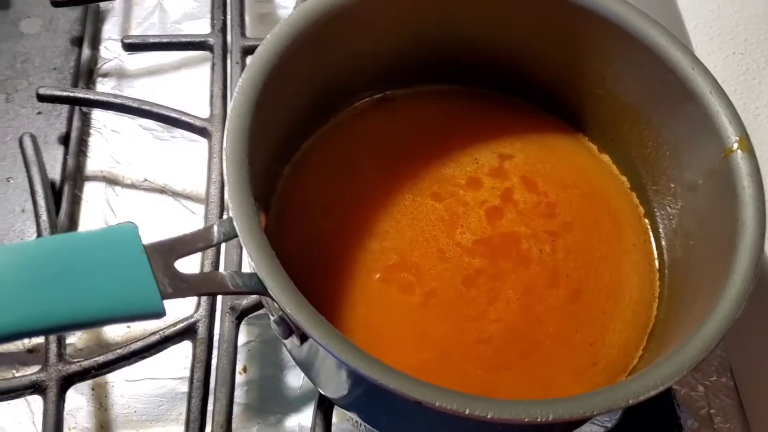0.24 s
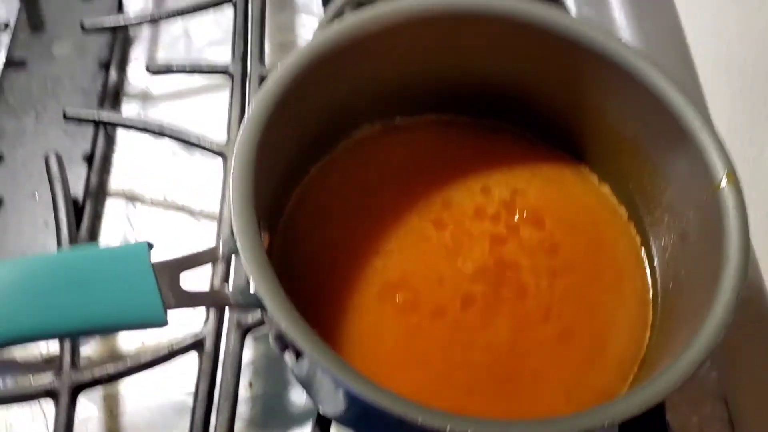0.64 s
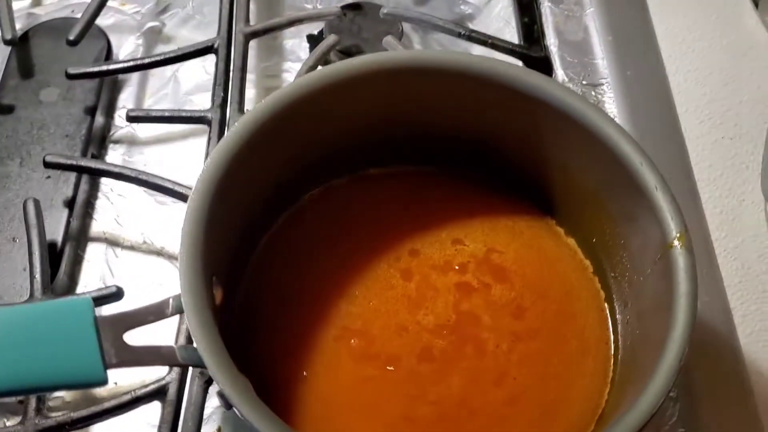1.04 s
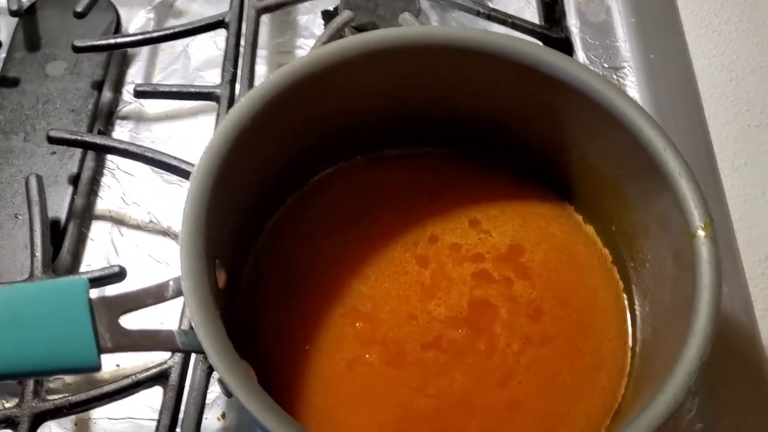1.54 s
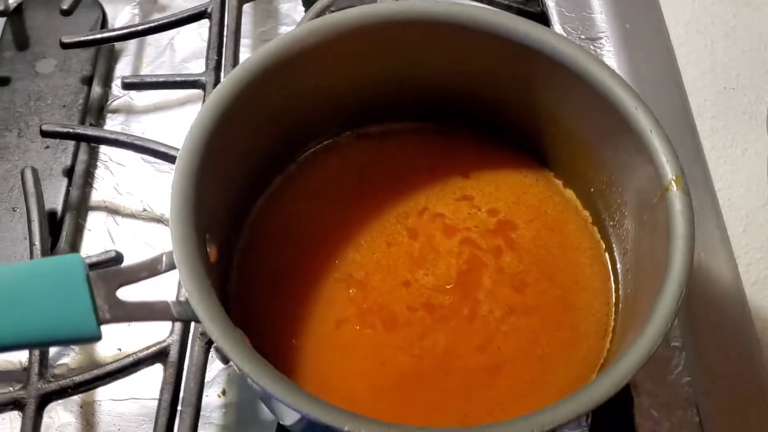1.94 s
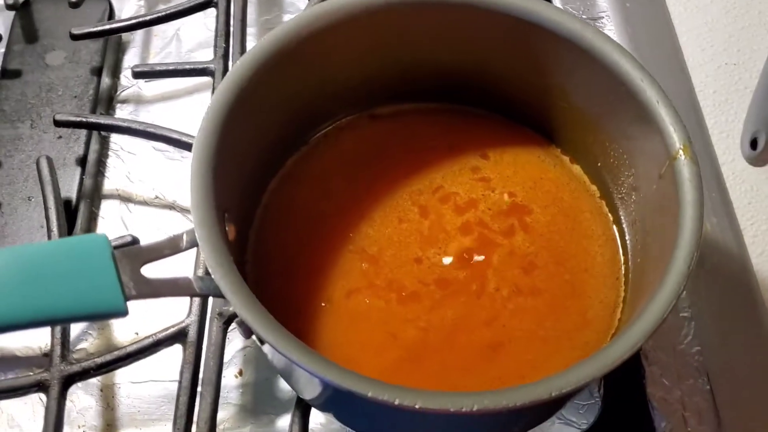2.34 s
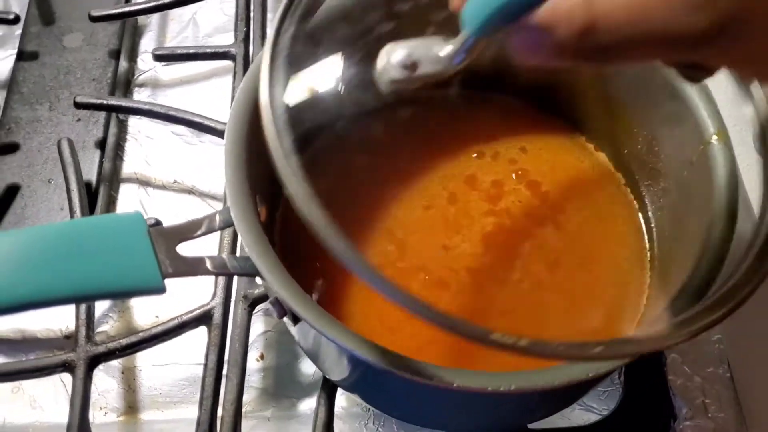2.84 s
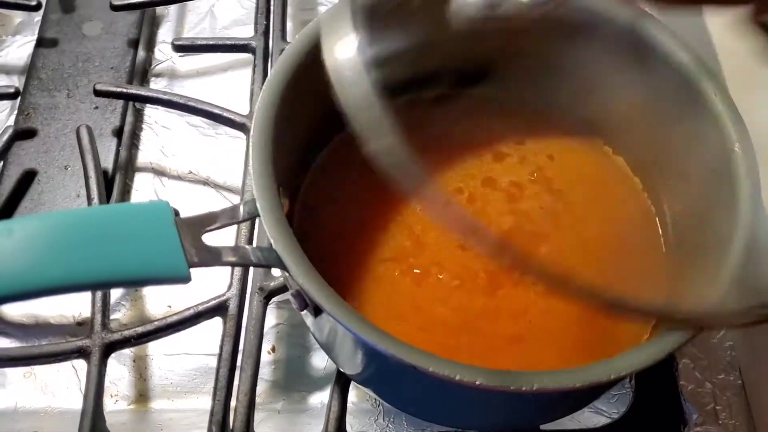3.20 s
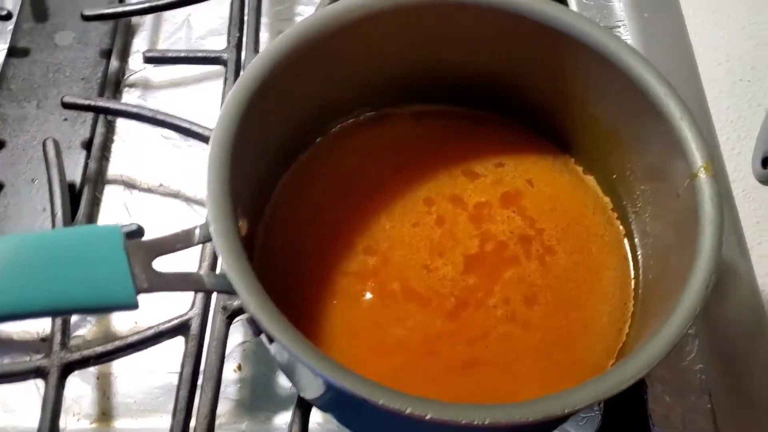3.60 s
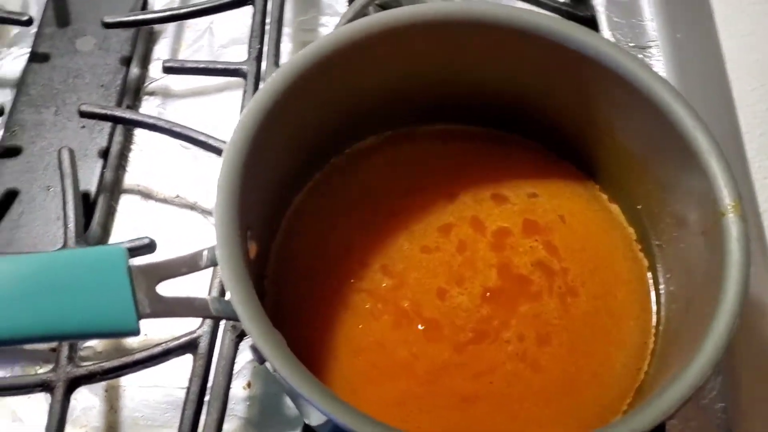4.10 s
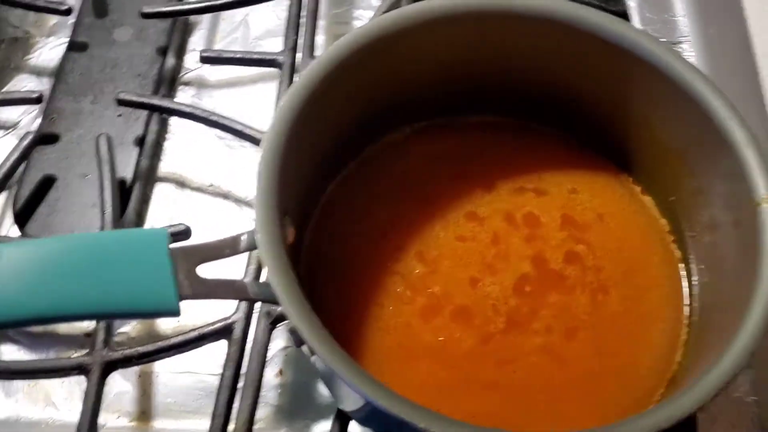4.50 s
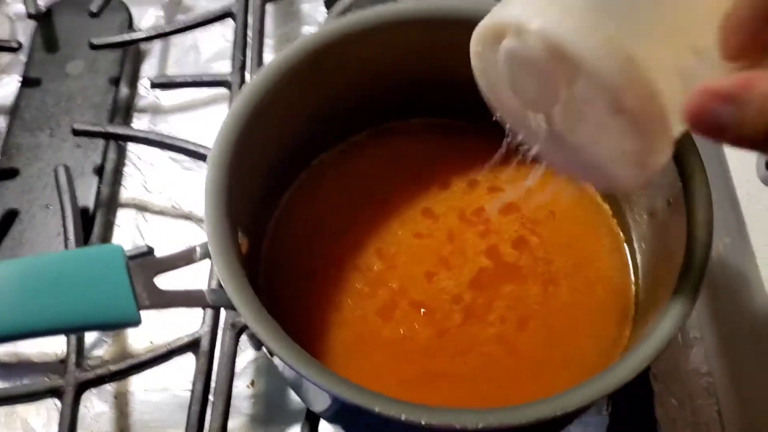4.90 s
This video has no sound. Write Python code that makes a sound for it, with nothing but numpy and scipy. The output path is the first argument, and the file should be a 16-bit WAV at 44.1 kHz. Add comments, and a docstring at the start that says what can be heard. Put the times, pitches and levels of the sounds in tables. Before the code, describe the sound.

A quiet small kitchen with hard walls, heard close in stereo, most sources slightly right; faint low rumble, murmur and hiss throughout. At 0-0.6 s there are light lid and utensil clinks, soft low bubble plops, a bright tick and a faint hinge squeak. At 0.73-0.96 s a quick tumble of hollow wooden knocks rattles the pots, with another weak squeak. Glassy clinks cluster around 1.26-1.35 s; a sleeve brushes near 1.5 s. Boomier thuds follow at 1.6-1.9 s, then a sharper knock group at 2.14-2.23 s. Small clinks come at 2.6 s, a barely audible thin tone at 2.9 s, and a moderate lid knock at 3.0 s. Cloth brushes at 3.4 s. The loudest passage, a dense hard clatter of wood and pots, runs 3.67-3.9 s. After a plop and tick near 4.35 s, salt shakes hiss, dry and grainy, at 4.6, 4.8, 4.9, 5.05 and 5.15 s.

```python
"""A small kitchen by the stove

A cupboard door squeaks, pots and a glass lid knock on wooden shelves and the counter, small things clink and
tick, a sleeve brushes, and at the end a salt shaker is shaken; sauce simmers and the room hums faintly.
Struck bodies are gritty contact forces driving resonances; rubbing, grains and air are shaped noise; the
hinge is a gliding overtone stack and bubbles are short rising tones. One faint, thin, slightly wavering tone
sounds by itself. Two microphone ports, a room with hard walls, most sounds a little to the right."""
import sys
import numpy as np
from scipy import signal
from scipy.fft import rfft, irfft, next_fast_len
from scipy.io import wavfile
from scipy.ndimage import uniform_filter1d, map_coordinates

SR = 44100
rng = np.random.default_rng(int(sys.argv[2]) if len(sys.argv) > 2 else 0)


def volts(x):
    """Linear amplitude factor 10**(x/20) for a level x in dB, scalar or array-like."""
    e = np.asarray(x, float) / 20
    return 10 ** e


def log_audio(samples):
    """Write samples as a 16-bit WAV file to the path given in sys.argv[1]."""
    # one column per channel
    frames = np.atleast_2d(samples).T
    # limit to full scale, then quantise
    limited = np.clip(frames, -1, 1)
    pcm = np.round(limited * 32767).astype(np.int16)
    wavfile.write(sys.argv[1], SR, pcm)


N = 227115
SPAN = 8192  # samples given to one contact or bubble


def unit(x):
    """Power normalisation: scaled to rms 1."""
    return x / np.sqrt(np.mean(x ** 2) + 1e-20)


def along(points, hz):
    """Interpolation of (Hz, value) points on a logarithmic frequency axis."""
    point_hz, value = np.transpose(points)
    return np.interp(np.log(hz + 1), np.log(point_hz + 1), value)


def wobble(rate, size=N):
    """Slow random modulation: a smooth curve through rate random knots a second."""
    knots = rng.standard_normal(int(size * rate / SR) + 4)
    return map_coordinates(knots, [np.arange(size) * rate / SR])


def swell(s, rise_s, fall_s):
    """Gaussian envelope of height 1, 20 dB down one rise before and one fall after its top."""
    late = np.arange(N) / SR - s
    return volts(-20 * (late / np.where(late < 0, rise_s, fall_s)) ** 2)


def filtered(x, response):
    """Linear filtering: the spectrum of x times a complex response of frequency."""
    m = next_fast_len(x.shape[-1] + 8192)
    spectrum = rfft(x, m) * response(np.fft.rfftfreq(m, 1 / SR))
    return irfft(spectrum, m)[..., :x.shape[-1]]


def modes(table, hz):
    """Modal superposition: causal response of (Hz, width Hz, dB) resonances with alternating signs."""
    total = 0
    for k, (centre_hz, width_hz, db) in enumerate(table):
        damping = 1j * hz * width_hz
        total = total + (-1) ** k * volts(db) * damping / (centre_hz * centre_hz - hz * hz + damping)
    return total


def above(hz, edge_hz):
    """Causal steep high-pass: two second-order sections in series."""
    s = 1j * hz / edge_hz
    return (s * s / (s * s + np.sqrt(2) * s + 1)) ** 2


def rush(colour, source=None):
    """Diffuse-field coherence: stereo noise of rms 1, alike in the bass and unrelated in the treble."""
    # likeness of the two channels: hz, correlation
    likeness = [(40, 1), (200, 0.92), (600, 0.62), (1500, -0.026), (4000, -0.009), (12000, 0.035)]
    pair = rng.standard_normal((2, N)) if source is None else source

    def response(hz):
        turn = np.arccos(np.clip(along(likeness, hz), -1, 1)) / 2
        return colour(hz) * [np.cos(turn), np.sin(turn)]

    mid, side = filtered(pair, response)
    return unit(np.array([mid + side, mid - side]))


def contact(t60, blow, blow_s, rise_s, grit_db):
    """Contact force: a short push, then a gritty chatter of small impacts that rises and dies."""
    t = np.arange(SPAN) / SR
    grit = volts(grit_db * np.repeat(rng.exponential(size=SPAN // 64), 64))  # strength held for 64 samples
    chatter = unit(grit * rng.standard_normal(SPAN))
    chatter = chatter * volts(-60 * t / max(t60, .004)) * (1 - np.exp(-t / rise_s))
    push = blow * t / blow_s * np.exp(1 - t / blow_s)
    return chatter + push


def add(track, s, db, sound):
    """Superposition: lays one sound on the track, the rms of its loudest 256 samples at the given level."""
    at = round(s * SR)
    loudest = np.sqrt(uniform_filter1d(sound ** 2, size=256).max())
    track[..., at:at + SPAN] += volts(db) * sound / loudest


def air():
    """Band noise: rumble, murmur and hiss drift together and each on its own, over the recorder's fine noise."""
    # common drift of the three room bands: time_s, level_db (before each band's offset)
    drift = [(0, -65), (.6, -65), (1.13, -67), (1.5, -63), (2.05, -64), (2.8, -66.5), (3.2, -62),
             (3.6, -60), (4.2, -66), (5.15, -64)]
    # colour of the air: hz, level_db (per Hz, relative within each band)
    air_colour = [(12, -42), (20, 0.5), (71, 15.5), (183, -18.5), (402, -22), (857, -31.5), (959, -34.5),
                  (1170, -31), (1270, -29.5), (1380, -33.5), (2860, -27), (3900, -32), (12300, -35.5),
                  (15000, -32), (16300, -60.5)]
    drift_s, drift_db = np.transpose(drift)
    db = np.interp(np.arange(N) / SR, drift_s, drift_db)

    def part(lo_hz, hi_hz):
        def band(hz):
            upper_slope = np.sqrt(1 - abs(above(hz, hi_hz)) ** 2)
            return volts(along(air_colour, hz)) * abs(above(hz, lo_hz)) * upper_slope
        return rush(band)

    rumble = volts(db + 3.5 + 0.65 * wobble(10)) * part(7.5, 170)
    murmur = volts(db + 4.0 + 0.67 * wobble(5.3)) * part(240, 1200)
    hiss = volts(db - 1.8 + 1.4 * wobble(6.1)) * part(1050, 3300)
    fine_noise = volts(-85.0 + 1.4 * wobble(0.82)) * part(4600, 16000)
    # all but the rumble flickers in patches of time and frequency
    z = signal.stft(murmur + hiss + fine_noise, nperseg=512)[2]
    patches = uniform_filter1d(rng.standard_normal(z.shape[1:]), size=4, axis=0)
    patches = uniform_filter1d(patches, size=14, axis=1)
    flickering = signal.istft(z * volts(3.3 * unit(patches)), nperseg=512)[1][:, :N]
    return rumble + flickering


def clinks():
    """Modal ringing under impact: glass and steel touch, upper modes stronger at the edge, treble damped."""
    # lid and utensils touching: start_s, level_db, edge_db (upper modes, before an offset), rattle_t60_s
    touches = [(.019, -44.5, -28, 0.055), (.029, -45, 13, 0.028), (.097, -51, -10, 0.12),
               (.23, -57.5, 7, 0.043), (1.201, -57.5, -26, 0.067), (1.259, -39.5, -15, 0.12),
               (1.266, -32.5, -10, 0.027), (1.273, -34, -12, 0.052), (1.292, -38.5, -11, 0.11),
               (1.299, -35, -14, 0.074), (1.319, -38.5, -14, 0.042), (1.336, -34, -5, 0.059),
               (1.35, -47, -22, 0.44), (2.371, -58.5, 24, 0.33), (2.613, -34, 14, 0.019),
               (2.626, -37, 13, 0.01), (3.003, -40.5, 15, 0.069), (3.188, -50, -18, 0.34),
               (3.253, -55.5, -26, 0.23), (3.291, -52.5, -33, 0.17)]
    # resonances of the lid: centre_hz, width_hz, level_db
    lid = [(689, 9, -2), (1410, 175, 1), (1490, 500, -5.5), (2050, 250, 0.5), (2337, 83, 2), (2910, 750, 8),
           (2850, 2060, -1.5), (3960, 180, -33)]
    track = np.zeros(N + SPAN)
    for s, db, edge_db, t60 in touches:
        tilt = [(1700, 0), (2300, edge_db + 3.5)]
        force = contact(t60, blow=3, blow_s=0.00012, rise_s=0.001, grit_db=3)

        def response(hz):
            damped = 1 / (1 + 1j * hz / 5000) ** 4
            return modes(lid, hz) * volts(along(tilt, hz)) * above(hz, 870) * damped

        add(track, s, db, filtered(force, response))
    return track[:N]


def plops():
    """Bubble resonance: each bubble bursting in the simmering sauce sings a few cycles, rising a little."""
    # bubbles: start_s, level_db, pitch_hz (nominal; the tone starts 5 % below)
    bubbles = [(.169, -53.5, 855), (.311, -56, 810), (.363, -56, 850), (.411, -53.5, 816),
               (.503, -45.5, 810), (0.536, -50.5, 850), (2.392, -51.5, 830), (2.66, -57.5, 915),
               (3.47, -59, 790), (4.341, -45, 760)]
    track, t = np.zeros(N + SPAN), np.arange(SPAN) / SR
    envelope = volts(-60 * t / .015) * (1 - np.exp(-t / .0003))  # t60 and rise in s
    for s, db, hz in bubbles:
        tone = np.sin(2 * np.pi * hz * t * (.95 + 6 * t))
        add(track, s, db, tone * envelope)
    return track[:N]


def ticks():
    """Brief contact: a very short force has a broad spectrum, heard here as treble alone."""
    # tiny bright ticks: start_s, level_db, top_db (gain from 12.5 kHz up)
    specks = [(0.249, -65, -17), (0.4377, -40.5, -35), (1.1164, -68, -15), (1.3255, -38.5, 18),
              (1.3369, -57.5, 2), (2.241, -55.5, -18), (2.486, -57.5, -21), (2.592, -55, 3),
              (2.618, -54, -5), (2.6898, -58.5, 3), (2.9861, -68, -6), (3.519, -57.5, -7),
              (4.3607, -49, -27), (4.4458, -49.5, -1)]
    track = np.zeros(N + SPAN)
    for s, db, top_db in specks:
        tilt = [(9000, 0), (12500, top_db)]
        force = contact(.014, blow=2, blow_s=.00003, rise_s=0.0003, grit_db=1.5)
        add(track, s, db, filtered(force, lambda hz: volts(along(tilt, hz)) * above(hz, 3500)))
    return track[:N]


def brushing():
    """Friction noise: a sleeve slides over a surface in short strokes of coloured noise."""
    # strokes: loudest_s, level_db (before the flutter), rise_s, fall_s
    strokes = [(.47, -68, 0.055, 0.1), (.68, -64, 0.43, 0.071), (1.53, -61, 0.17, 0.11),
               (2.38, -67, .04, .07), (2.91, -69.5, 0.1, .08), (3.395, -54, 0.045, 0.079),
               (4.05, -69, .1, 0.21), (4.31, -65.5, 0.18, .03)]
    # colour of the cloth: hz, level_db (per Hz, relative)
    cloth = [(880, -3), (1500, 1), (2720, -17), (3380, -2.5), (4870, -28), (6060, -8), (7610, -8),
             (8830, -15.5), (11500, -7.5), (14800, -13), (16000, -27)]
    envelope = sum(volts(db) * swell(s, rise_s, fall_s) for s, db, rise_s, fall_s in strokes)
    flutter = volts(0.74 * wobble(45))
    return envelope * flutter * rush(lambda hz: volts(along(cloth, hz)))


def squeak():
    """Stick-slip oscillation: the hinge slips at a gliding rate with uneven overtones.

    One faint, thin, slightly wavering tone sounds later by itself."""
    # squeaks: loudest_s, level_db (added to each overtone's), slips_hz, glide_hz_per_s, half_length_s
    squeaks = [(.45, -60, 505, -110, .1), (.79, -67, 588, 260, .09), (2.13, -66, 742, 100, .05)]
    # strength of the hinge's overtones: hz, level_db
    hinge_colour = [(500, -5), (1000, -22), (2050, -13), (2550, 2), (3060, -10), (3570, -10), (4080, -10),
                    (4600, -11), (5100, -22), (5600, -22), (6100, -11), (6600, -26), (9000, -40)]
    # thin tone: start_s, end_s, pitch_hz, level_db (both before a slight wander)
    thin_tones = [(2.822, 2.973, 1367, -70)]
    track = np.zeros(N)
    for s, db, rate, glide, half_s in squeaks:
        start, end = round((s - 1.3 * half_s) * SR), round((s + 1.3 * half_s) * SR)
        size = end - start
        slips = rate + glide * (np.arange(start, end) / SR - s)
        phase = 2 * np.pi * np.cumsum(slips * (1 + .006 * wobble(60, size))) / SR
        stack = np.zeros(size)
        for k in range(1, 16):
            overtone_db = along(hinge_colour, rate * k) + 5 * wobble(35, size)
            stack += volts(overtone_db) * np.sin(k * phase)
        track[start:end] += np.sqrt(2) * volts(db) * swell(s, half_s, half_s)[start:end] * stack
    for start_s, end_s, hz, db in thin_tones:
        start, end = round(start_s * SR), round(end_s * SR)
        size = end - start
        level = np.hanning(size) * volts(db + 2.2 * wobble(30, size))
        cycles = hz * np.cumsum(1 + .004 * wobble(40, size)) / SR
        track[start:end] += level * np.sin(2 * np.pi * cycles)
    return track


def knocks():
    """Modal excitation: each blow rings the wood at new strengths and wakes the pots; firm blows settle sooner."""
    # blows on wood: start_s, level_db, boom_db, clatter_db (bass and upper gains in the wood),
    # crack_db (pots over the blow)
    blows = [(0.73, -48.5, 9, -15, -13.5), (0.763, -52, -6, -18, -18), (0.817, -32, 4, 3.5, -12),
             (0.839, -29.5, 1, -13, -44), (0.86, -28, 12.5, -1, -15.5), (0.881, -17, -1.5, 4.5, -19.5),
             (0.89, -20, -2, -6, -27), (0.904, -25.5, 10, -20, -21.5), (0.922, -32, -2, -15, -22),
             (0.94, -22.5, 4, 0, -24), (0.959, -30.5, 5.5, -16, -40), (1.311, -41.5, 6.5, 13.5, -16),
             (1.595, -37, 20.5, 1, -37), (1.711, -42, 27, 9, -45), (1.729, -28, 18, -5, -51),
             (1.777, -28.5, 11.5, -15, -27), (1.8, -35, 10, 9, -18), (1.825, -21, 7.5, -9, -20.5),
             (1.842, -19.5, 2, 2.5, -12.5), (1.861, -22, 1.5, -29, -20), (1.899, -43, -28, -12, -18),
             (2.1, -44, 10, 3, -8.5), (2.14, -22.5, 3, 11, -32), (2.151, -27.5, -4, 3, -20),
             (2.167, -27, 7, 4, -17), (2.199, -28, 4, 6, -19.5), (2.226, -38, 18, -20, -32),
             (2.951, -48, 10, 5, -38), (3.004, -27.5, 5.5, 2, -30), (3.029, -36, 5, -17, -45),
             (3.069, -41, 13, -20, -45), (3.669, -8.5, 1.5, 3.5, -17.5), (3.681, -17, 6, -3, -34),
             (3.698, -13.5, 3.5, 1, -21.5), (3.717, -22, 11, -2, -19), (3.737, -13.5, -18, -3.5, -27),
             (3.764, -17.5, 9.5, -4, -19.5), (3.789, -22, -5, 8.5, -36), (3.805, -16.5, 1, 3.5, -14),
             (3.817, -22.5, -1, 13, 0.5), (3.841, -9.5, -10, 2, -15.5), (3.864, -18, -4, 9.5, -13),
             (3.884, -15, -6, -18.5, -18.5), (3.907, -20, 2.5, 0, -29)]
    # resonances of cupboard and counter: centre_hz, width_hz, level_db (mean over blows)
    wood_modes = [(108, 110, -11.5), (125, 36.7, -0.5), (191, 20, -10), (244.2, 28, -9.5), (281, 19, -7),
                  (383.1, 10.3, 3.5), (427, 45, -8.5), (542.6, 54, 6.5), (562.7, 58.5, 1), (648, 64, -5.5),
                  (733.4, 34, -2.5), (850, 66, -11.5), (984, 67, -15.5), (982, 150, -10),
                  (1260, 200, -11.5), (1448, 210, -10), (1660, 150, -8.5), (2000, 750, -12)]
    # resonances of the pots: centre_hz, width_hz, level_db (mean over blows)
    pot_modes = [(2060, 860, -18.5), (2830, 360, 3), (3604, 130, 2), (4190, 420, -6), (5990, 1000, -4),
                 (7450, 510, -8.5), (9630, 1200, -11), (14300, 5200, -23)]
    track = np.zeros(N + SPAN)
    for s, db, boom_db, clatter_db, crack_db in blows:
        t60 = 0.071 * volts(-0.19 * (db + 20.5))  # s; 0.19 dB shorter per dB harder
        force = contact(t60, blow=8, blow_s=.00025, rise_s=.003, grit_db=2.5)
        hollow_db = 1.5 + .3 * boom_db  # the cupboard's hollow note partly follows the boom
        tilt = [(180, boom_db), (280, hollow_db - 2.0), (430, hollow_db), (500, 0.01), (680, 0),
                (1200, clatter_db), (2200, clatter_db - 4.0), (6000, clatter_db - 17)]
        struck = np.add(wood_modes, [0, 0, 2.5] * rng.standard_normal((len(wood_modes), 1)))
        wood = filtered(force, lambda hz: modes(struck, hz) * volts(along(tilt, hz)) * above(hz, 110))
        rattle = contact(.7 * t60, blow=.8, blow_s=.00005, rise_s=.007, grit_db=3)
        shaken = np.add(pot_modes, [0, 0, 3] * rng.standard_normal((len(pot_modes), 1)))
        pots = filtered(rattle, lambda hz: modes(shaken, hz) * above(hz, 1900))
        add(track, s, db, wood)
        add(track, s, db + crack_db, pots)
    return track[:N]


def salt():
    """Granular impact noise: grains hiss against the wall at each jerk; the hollow body resonates under them."""
    # jerks of the shaker: loudest_s, level_db (before the flutter), rise_s, fall_s, hollow_db (over the jerk)
    shakes = [(4.363, -50, 0.0066, 0.049, -11), (4.616, -40, 0.062, 0.11, -14),
              (4.775, -44, 0.039, 0.061, -10), (4.836, -40.5, 0.032, 0.042, -3.5),
              (4.906, -39.5, 0.037, 0.083, -20.5), (5.05, -38.5, 0.054, 0.051, -20),
              (5.155, -40, 0.032, .05, -26)]
    # colour of the grains: hz, level_db (per Hz, relative)
    grain_colour = [(880, -21.5), (1500, -23), (1620, -7.5), (2450, 3), (4110, -0.5), (5550, 0),
                    (9230, -7.5), (14900, -9), (15800, -15), (16300, -50.5)]
    jerks = [volts(db) * swell(s, rise_s, fall_s) for s, db, rise_s, fall_s, _ in shakes]
    trickle = volts(-58.5) * swell(4.63, rise_s=0.32, fall_s=0.88)  # loose grains between the jerks
    level = sum(jerks) + trickle
    body = sum(jerk * volts(row[-1]) for jerk, row in zip(jerks, shakes))
    # dense noise whose strength varies from sample to sample stands for the grains
    strength = volts(2.14 * np.minimum(rng.exponential(size=N), 6))
    grains = rng.standard_normal((2, N)) * strength
    hiss = rush(lambda hz: volts(along(grain_colour, hz)), grains)
    hollow = rush(lambda hz: modes([(1282, 230, 0.5), (1660, 240, -2)], hz), grains)
    flutter = volts(1.24 * wobble(46))
    return flutter * (level * hiss + body * hollow)


def ports(x, lag_s, left_db):
    """Time and level differences: the far port hears a source later and weaker, split evenly about zero."""
    side = np.array([[1], [-1]]) / 2
    return filtered(x, lambda hz: volts(side * left_db) * np.exp(-2j * np.pi * hz * side * lag_s))


def kitchen(x, size=16384):
    """Reverberant decay: hard walls answer; every stretch of sound gets its own noise tail at each port."""
    # decay of the room: hz, t60_s
    decay = [(100, 0.39), (500, 0.23), (2000, 0.18), (6000, 0.2), (14000, 0.032)]
    # gain of the room: hz, level_db
    room_gain = [(100, -29), (400, -8), (1500, 4.5), (6000, -4.5), (14000, -1)]
    out = np.zeros((2, N + SR))
    for at in range(0, N, size):
        hz, t, z = signal.stft(rng.standard_normal((2, SR // 3)), SR, nperseg=256)
        t60 = along(decay, hz)[:, None]
        z = z * volts(-60 * t / t60) / np.sqrt(t60)  # evens the energy of long and short decays
        tail = signal.istft(z, SR, nperseg=256)[1]
        echo = signal.fftconvolve(x[None, at:at + size], tail / np.linalg.norm(tail[0]), axes=1)
        first = at + 130  # the room answers 130 samples late
        out[:, first:first + echo.shape[1]] += echo
    return filtered(out[:, :N], lambda hz: volts(along(room_gain, hz)))


def scene():
    """Direct and reverberant fields: all sources; clinks and ticks lie closer and stir the room less."""
    light, fine, hinge, heavy = clinks(), ticks(), squeak(), knocks() + plops()
    near = ports(heavy, lag_s=0.0002418, left_db=-3.5)
    near += ports(light, lag_s=0.00012, left_db=-9.0)
    near += ports(fine, lag_s=.0001, left_db=0.0)
    near += ports(hinge, lag_s=0.00023, left_db=-15)
    # the sources that are already stereo noise get no room echo
    spread = ports(air() + brushing(), lag_s=0, left_db=-2.5)
    spread += ports(salt(), lag_s=0, left_db=-2.0)
    echoes = kitchen(heavy + volts(-7.5) * light + volts(-1) * fine + hinge)
    return near + echoes + spread


def top_cut(x):
    """Nothing passes above the cut-off."""
    return signal.sosfilt(signal.butter(12, 16520, fs=SR, output="sos"), x)


def record(dry):
    """Band limiting and soft saturation: the top treble rolls off and the loudest peaks are squeezed."""
    dull = filtered(dry, lambda hz: 1 / (1 + (hz / 16000) ** 60))
    squeezed = dull / (1 + np.abs(dull / .95) ** 4) ** (1 / 4)
    return top_cut(squeezed)


dry = scene()
out = record(dry)
log_audio(out)
```